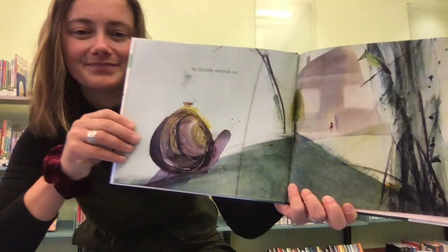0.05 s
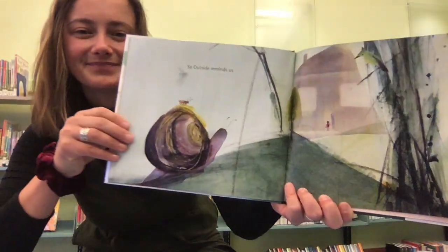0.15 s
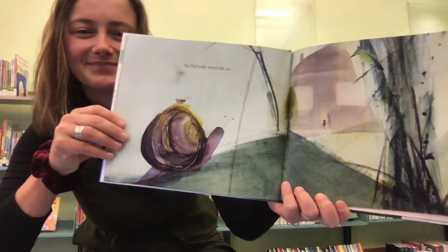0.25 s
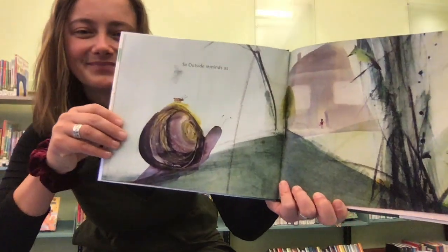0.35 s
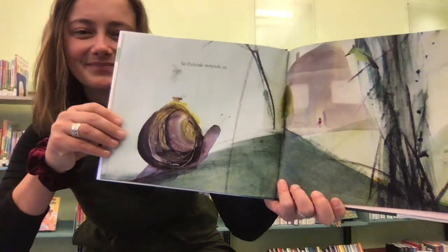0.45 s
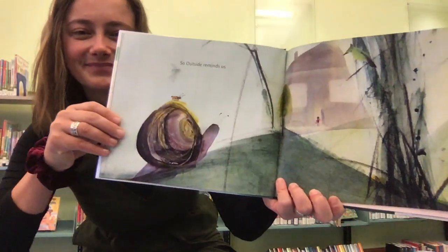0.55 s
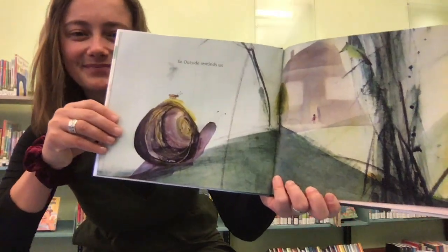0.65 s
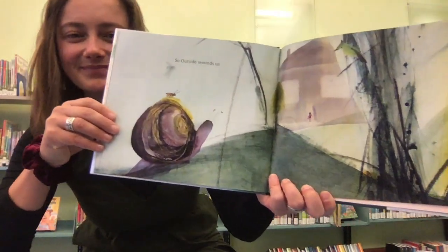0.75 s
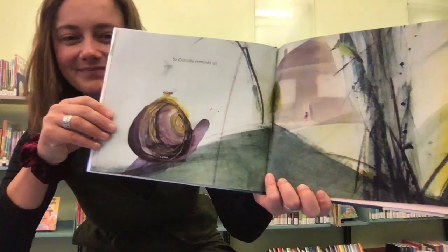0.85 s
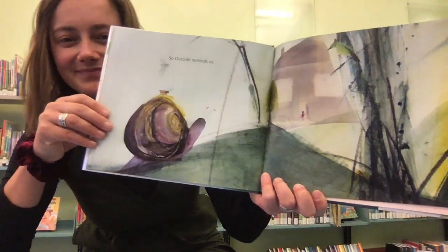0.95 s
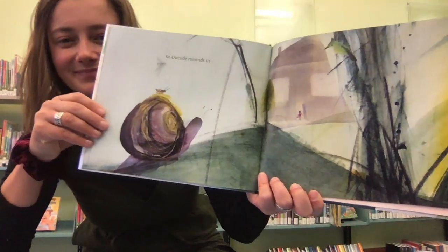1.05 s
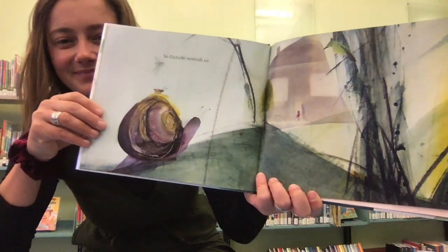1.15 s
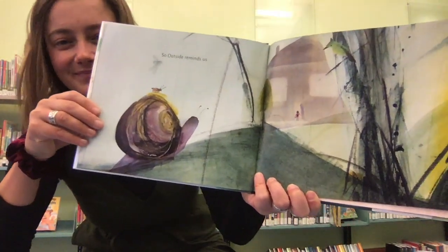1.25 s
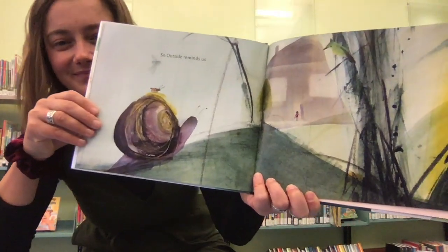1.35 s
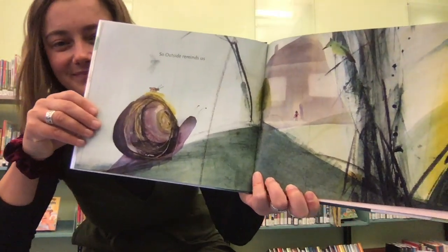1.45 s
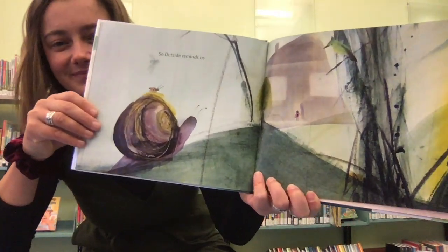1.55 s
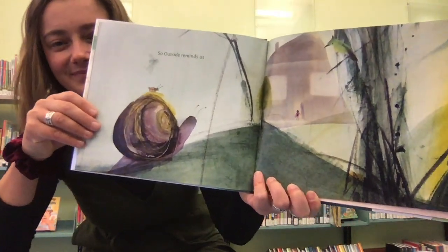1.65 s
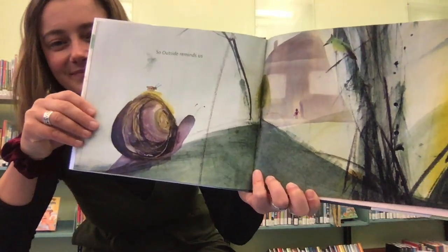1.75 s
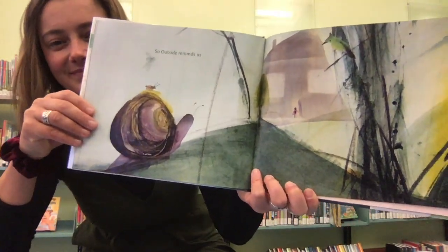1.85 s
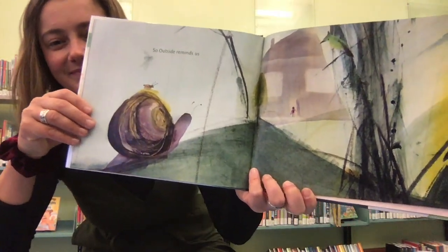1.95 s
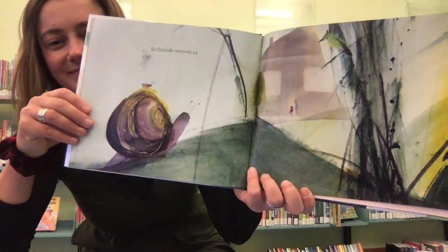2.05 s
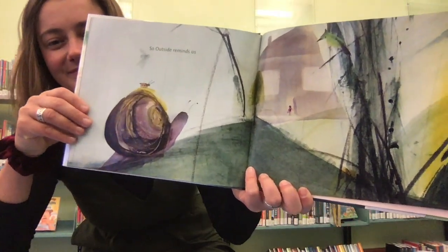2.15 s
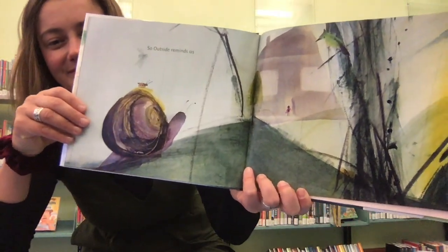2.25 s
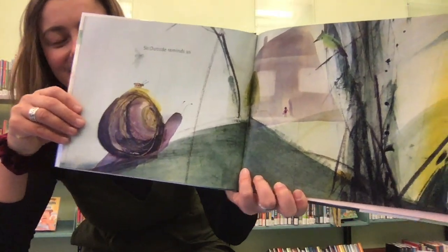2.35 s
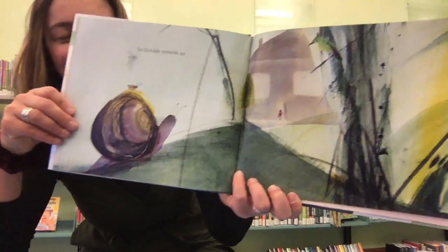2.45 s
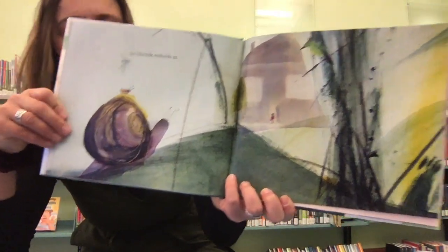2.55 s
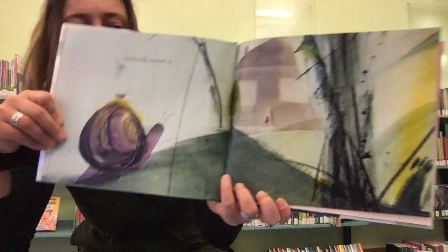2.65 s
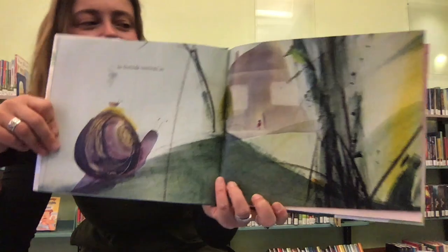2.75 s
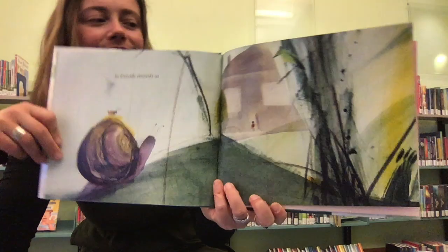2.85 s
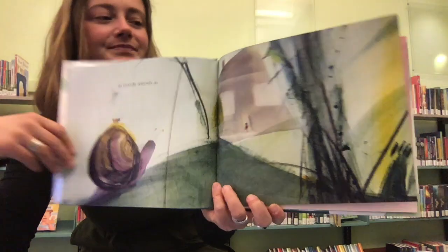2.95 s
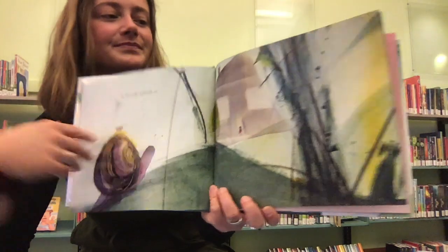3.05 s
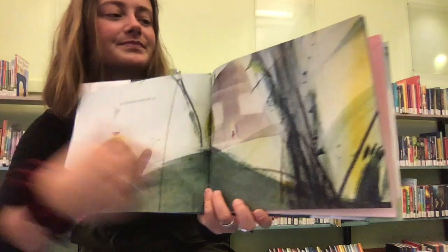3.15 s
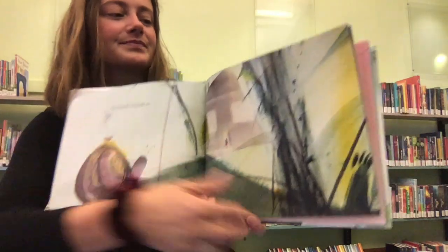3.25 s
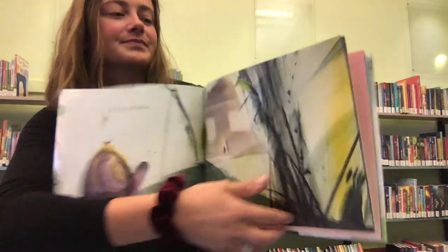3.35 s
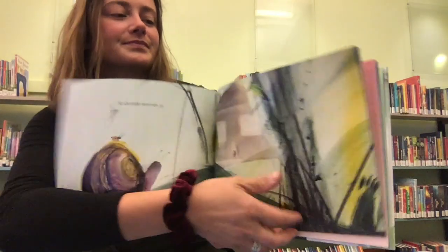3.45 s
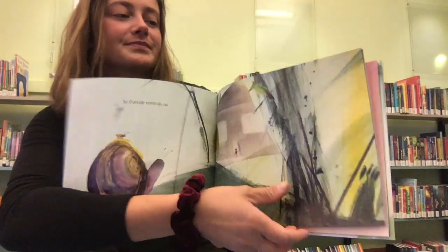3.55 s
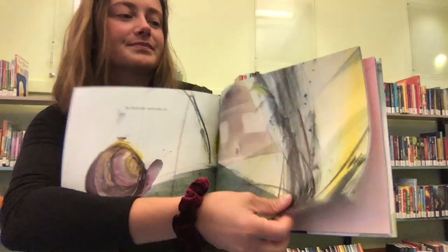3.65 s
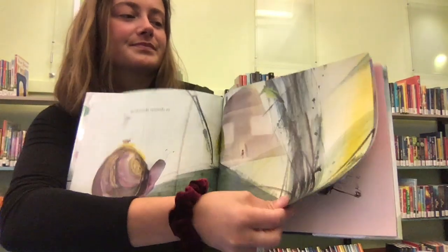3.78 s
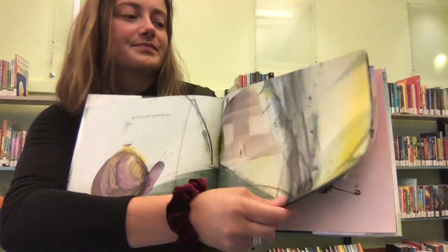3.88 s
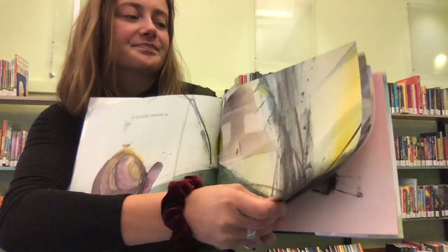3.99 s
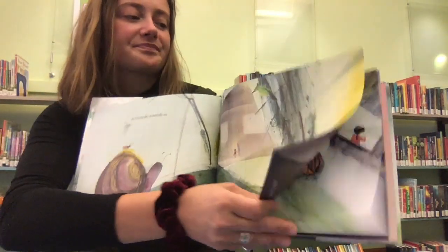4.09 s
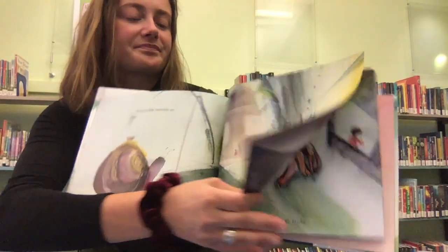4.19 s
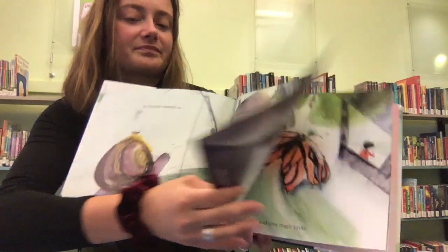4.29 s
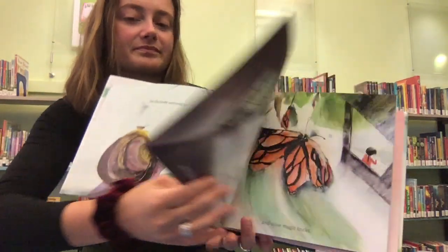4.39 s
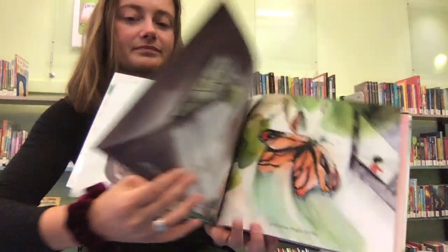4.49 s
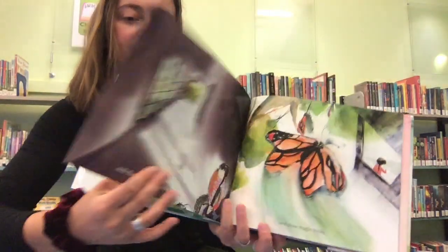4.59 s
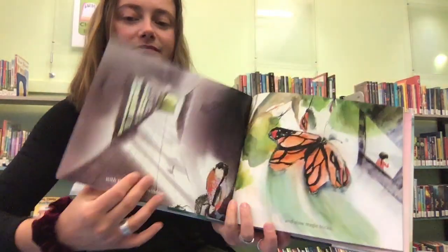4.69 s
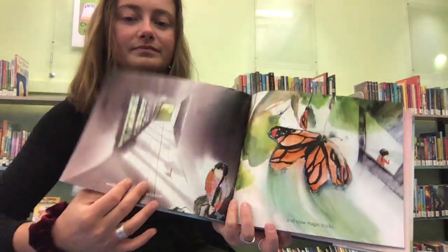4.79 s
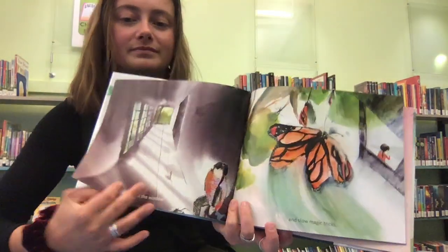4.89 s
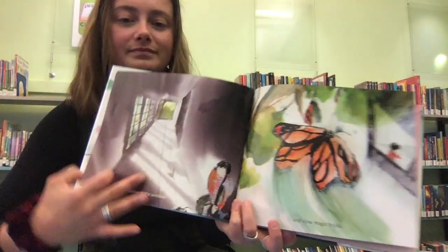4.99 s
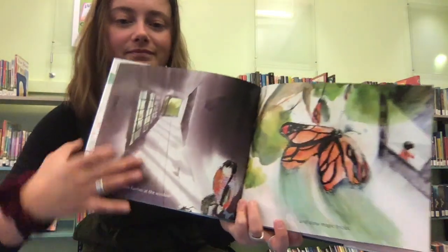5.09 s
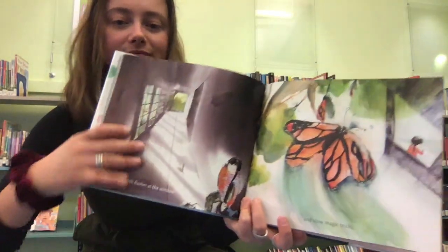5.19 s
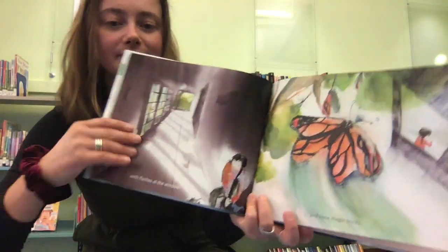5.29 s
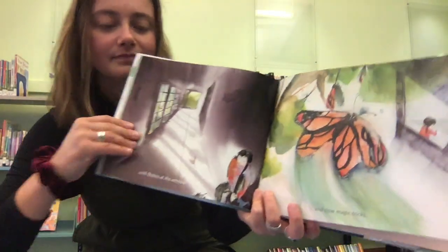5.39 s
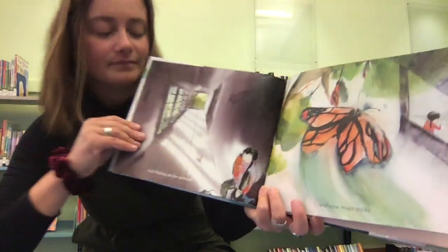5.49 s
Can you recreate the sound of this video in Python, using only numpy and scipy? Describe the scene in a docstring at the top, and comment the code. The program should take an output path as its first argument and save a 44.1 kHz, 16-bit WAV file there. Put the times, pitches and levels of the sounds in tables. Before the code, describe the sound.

A quiet library with low, slightly restless ventilation noise and a faint steady hum throughout, heard close with a short dull echo. Near 0.1 s the book's binding creaks weakly, with tiny paper ticks around 0.2 s. Sparse ticks follow, a clearer one at 1.5 s. From 2.35 to 3.1 s the grip shifts with faint rubbing, stick-slip creaking and small taps. At about 3.4 s fingers knock on the cover board in a tight, hollow cluster, the strongest knock so far, with dull low bumps. From 3.75 to 4.5 s a stiff page is drawn away in short, bright, uneven rasps; sharp snaps and crinkles crowd together between 4.1 and 4.36 s, the loudest moment. At 4.56 s the page lands with a light double knock. Softer palm strokes smooth it until 5.5 s, with small taps near 4.95 s, very faint gliding papery hisses and a low closing bump.

```python
"""The binding of a large picture book creaks and its paper ticks in the grip, in a quiet library.
Fingers shift their hold and knock on the cover board; then one stiff page is drawn off the next sheet.
It slides in short pulls of filtered friction grains and buckles in sharp snaps: air pulse, crack and ring.
It falls over and a palm smooths it flat in softer strokes, some edges singing in gliding narrow bands.
Low ventilation noise and a steady mains hum lie underneath throughout."""
import sys
import numpy as np
from scipy import signal
from scipy.fft import rfft, irfft, next_fast_len
from scipy.io import wavfile

SR = 44100
rng = np.random.default_rng(int(sys.argv[2]) if len(sys.argv) > 2 else 0)


def pcm_store(signal):
    """Save signal as 16-bit PCM."""
    levels = np.round(np.clip(np.atleast_2d(signal), -1, 1) * 32767)
    wavfile.write(sys.argv[1], SR, levels.astype(np.int16).T)


N = 243740
T = np.arange(N) / SR  # time in seconds
HIT_T = T[:8192]  # time within one short hit, in seconds

# Hiss of skin on paper, for grip and palm. Each row: frequency in Hz, relative level in dB.
SKIN_HISS = [(2200, -1.5), (3200, -4.5), (4600, -5), (7200, -6), (8800, -14), (10200, -10), (11400, -27),
             (15500, -23)]


def undb(db):
    """Decibels to gain."""
    return 10 ** (np.asarray(db) / 20)


def unit(x):
    """Scale to rms 1."""
    return x / np.sqrt(np.mean(x ** 2))


def peak(x):
    """Scale to peak 1."""
    return x / np.abs(x).max()


def add(out, start, x):
    """Mix x into out from a start in seconds."""
    i = max(int(start * SR), 0)
    out[i:i + len(x)] += x[:N - i]


def colour(x, points):
    """Minimum-phase filter through (Hz, relative dB) points, with mean power gain 1."""
    size = next_fast_len(len(x) // 2 + 2048) * 2
    hz, db = np.transpose(points)
    f = np.maximum(np.arange(size // 2 + 1) * SR / size, 1)
    gain = unit(undb(np.interp(np.log(f), np.log(hz), db)))
    # folding the cepstrum forward in time makes the filter causal
    cepstrum = irfft(np.log(gain))
    cepstrum[1:size // 2] *= 2
    cepstrum[size // 2 + 1:] = 0
    response = np.exp(rfft(cepstrum))
    return irfft(rfft(x, size) * response)[:len(x)]


def walk(rate):
    """Random curve of rms 1, straight between knots that come rate times a second."""
    knots = rng.standard_normal(int(N / SR * rate) + 2)
    return unit(np.interp(T * rate, np.arange(len(knots)), knots))


def grains(size, rate, spread_db):
    """Fibres catching and letting go: random clicks per second, a few much larger than the rest."""
    catches = rng.random(size) < rate / SR
    strength = rng.standard_normal(size)
    boost = undb(spread_db * np.minimum(rng.exponential(size=size), 4))
    return unit(catches * strength * boost)


def ring(modes, contact_ms, detune):
    """Damped modes, each pitch drawn a little at random; a longer push leaves out the high ones."""
    hz, t60, db = np.transpose(modes)[:, :, None]
    hz = hz * (1 + detune * rng.standard_normal(hz.shape))
    decay = np.exp(-np.log(1000) * HIT_T / t60)
    free = np.sum(undb(db) * np.cos(2 * np.pi * hz * HIT_T) * decay, axis=0)
    push = np.sin(np.pi * np.minimum(1000 * HIT_T / contact_ms, 1)) ** 2
    return peak(signal.fftconvolve(free, push)[:len(HIT_T)])


def burst(decay_s, tail_db, tail_s):
    """A sharp crack of noise with a weaker, slower-fading noise tail."""
    crack = np.exp(-HIT_T / decay_s)
    tail = undb(tail_db) * np.exp(-HIT_T / tail_s)
    return rng.standard_normal(len(HIT_T)) * (crack + tail)


def wander(x, depth_db, rate=18):
    """As the sheet bends, different parts of its hiss come through: each band swells and fades alone."""
    centres = np.geomspace(2500, 12000, 7)  # Hz
    spectrum = rfft(x)
    f = np.arange(N // 2 + 1) * SR / N
    out = np.zeros(N)
    for band in np.eye(len(centres)):
        part = irfft(spectrum * np.interp(f, centres, band), N)
        out += part * undb(depth_db * walk(rate))
    return unit(out)


def strokes(rows, attack_s, sag_db_per_s, release_s):
    """Gains of rub and hiss: each stroke takes hold, eases while it slides, then dies away."""
    rub, hiss = np.zeros(N), np.zeros(N)
    for start, end, rub_db, hiss_db in rows:
        age = np.maximum(T - start, 0)
        hold = np.minimum(age / attack_s, 1) * undb(-sag_db_per_s * age)
        effort = hold * np.exp(-np.maximum(T - end, 0) / release_s)
        rub = np.maximum(rub, undb(rub_db) * effort)
        hiss = np.maximum(hiss, undb(hiss_db) * effort)
    return rub, hiss


def slide(gains, rub_colour, hiss_colour, rub_db, hiss_db, grain_rate, spread_db, judder_db, wander_db):
    """Paper friction: dense catches drive the sheet and hiss at the contact; the hand judders both."""
    rub, hiss = gains
    body = colour(grains(N, grain_rate, spread_db), rub_colour)
    top = wander(colour(grains(N, 2 * grain_rate, spread_db), hiss_colour), wander_db)
    judder = unit(undb(judder_db * walk(130)))
    return (body * undb(rub_db) * rub + top * undb(hiss_db) * hiss) * judder


def page_pulls():
    """The page is drawn off the next sheet in short pulls of bright paper friction."""
    # Each row: start in seconds, end in seconds, rub and hiss levels in dB before trim, judder and sag.
    pulls = [(3.745, 3.792, -43.5, -44.5), (3.8, 3.87, -52.5, -52.5), (3.874, 3.93, -37, -39),
             (3.935, 4.01, -46, -44), (4.02, 4.085, -42, -48), (4.13, 4.28, -52.5, -64),
             (4.295, 4.362, -46.5, -50), (4.432, 4.488, -55, -64)]
    # Colours of rub and hiss. Each row: frequency in Hz, relative level in dB.
    rub_colour = [(150, -13.5), (450, -7), (950, 1), (1600, -2), (2200, -6.5), (2650, -6.5), (3300, -38)]
    hiss_colour = [(2000, -15), (3000, -1), (4200, 0.5), (7000, -3), (9000, -12.5), (10300, -11),
                   (11500, -24), (15500, -20.5)]
    gains = strokes(pulls, attack_s=0.022, sag_db_per_s=23, release_s=0.025)
    return slide(gains, rub_colour, hiss_colour, rub_db=2.0, hiss_db=-3.5,
                 grain_rate=4000, spread_db=2, judder_db=0.95, wander_db=2.5)


def snaps(flip_s=0.0002, crack_s=0.0011, tail_db=-10, tail_s=0.004, ring_db=-16):
    """The bowed sheet flips through: one suck-and-push of air, a crack, and a short ring."""
    # Buckles of the sheet. Each row: time in seconds, peak of the air pulse in dB, peak of the crack in dB.
    buckles = [(3.8624, -37, -31.5), (4.0316, -34.5, -27), (4.1134, -20.5, -27.5), (4.1377, -17.5, -28.5),
               (4.1857, -16, -22.5), (4.2267, -16, -23.5), (4.2626, -15.5, -28), (4.3008, -21, -33.5),
               (4.3204, -22, -49), (4.3572, -20.5, -35), (4.5537, -28, -58)]
    # Colour of the crack. Each row: frequency in Hz, relative level in dB.
    crack_colour = [(900, 2), (2000, 13.5), (3300, -6.5), (4700, 3), (7000, 0.5), (9800, -2), (10700, -6),
                    (11800, -21), (15500, -28)]
    # Modes of the sheet. Each row: frequency in Hz before detuning, t60 in seconds, relative level in dB.
    sheet_modes = [(556, 0.028, -19), (695, .03, -18), (912, 0.043, 20), (1270, 0.038, -15),
                   (1520, .02, -12), (2400, .015, -21)]
    out = np.zeros(N)
    lead = .001  # seconds from the start of the pulse to its middle
    u = (HIT_T - lead) / flip_s
    pulse = peak(u * np.exp(-np.hypot(u, .8) ** 1.965 / 2))
    for time, pulse_db, crack_db in buckles:
        crack = peak(colour(burst(crack_s, tail_db, tail_s), crack_colour))
        add(out, time - lead, undb(pulse_db) * pulse)
        add(out, time - flip_s, undb(crack_db) * crack)
        # the ring level is relative to the pulse
        add(out, time + lead, undb(pulse_db + ring_db) * ring(sheet_modes, contact_ms=0.32, detune=0.14))
    return out


def creases(rate=9000, treble_db=-15):
    """A kink runs through the paper as a quick swell of tiny snaps."""
    # Each row: start in seconds, rms level in dB, length in seconds, centre frequency in Hz.
    kinks = [(.446, -62.5, 0.0045, 2250), (3.371, -42, 0.0018, 1280), (3.424, -37.5, 0.0086, 1530),
             (3.638, -50.5, 0.021, 1420), (3.863, -32.5, 0.0047, 1300), (4.096, -36.5, 0.0084, 1930),
             (4.136, -32, 0.02, 1620), (4.155, -35, 0.02, 1100), (4.187, -28.5, 0.00535, 920),
             (4.303, -32, 0.012, 1000), (4.352, -34.5, 0.014, 2050), (5.032, -49, 0.013, 3200)]
    out = np.zeros(N)
    for start, db, length, hz in kinks:
        swell = np.sqrt(np.sin(np.pi * np.minimum(HIT_T / length, 1)))
        tone = [(hz / 6, -20), (hz / 2, -3), (hz, 0), (hz * 1.22, -6), (hz * 1.87, treble_db),
                (10500, -36), (12500, -48)]
        x = colour(grains(len(HIT_T), rate, spread_db=0.5) * swell, tone)
        rms = np.sqrt(np.sum(x ** 2) / (length * SR))
        add(out, start, undb(db) * x / rms)
    return out


def sing(start, end, from_hz, to_hz, width_hz, db):
    """One narrow band of noise around a gliding pitch; faster walks make it wider."""
    progress = np.clip((T - start) / (end - start), 0, 1)
    phase = 2 * np.pi * np.cumsum(from_hz + (to_hz - from_hz) * progress) / SR
    band = walk(width_hz) * np.cos(phase) + walk(width_hz) * np.sin(phase)
    return undb(db) * np.sin(np.pi * progress) * band


def singing_edges():
    """Sliding edges ring in narrow bands that glide as the free length of paper changes."""
    # Each row: start in seconds, end in seconds, first pitch in Hz, last pitch in Hz,
    # rough bandwidth in Hz, level in dB at mid-swell.
    glides = [(3.761, 3.828, 1190, 1452, 300, -39.5), (3.928, 3.998, 1755, 1565, 300, -40),
              (4.849, 4.97, 777, 754, 140.9, -55.5), (5.134, 5.337, 5000, 4610, 1300, -71.5),
              (5.291, 5.439, 3900, 4314, 1100, -64.5), (5.418, 5.526, 4410, 4840, 1483, -63.5)]
    return sum(sing(*row) for row in glides)


def palm_strokes():
    """The palm smooths the page flat: dense, fine friction with a low rub."""
    # Each row: start in seconds, end in seconds, rub and hiss levels in dB before trim, judder and sag.
    wipes = [(4.545, 4.68, -52, -61.5), (4.72, 4.84, -55.5, -64), (4.845, 5.035, -56.5, -56),
             (5.1, 5.25, -64, -68.5), (5.275, 5.385, -56.5, -65), (5.435, 5.485, -56, -62.5)]
    # Colour of the rub. Each row: frequency in Hz, relative level in dB.
    rub_colour = [(130, -7), (200, -2.5), (330, -7.5), (500, -4.5), (760, -1), (1050, -5), (2200, -10.5),
                  (3200, -37.5)]
    gains = strokes(wipes, attack_s=0.009, sag_db_per_s=10.5, release_s=0.044)
    return slide(gains, rub_colour, SKIN_HISS, rub_db=-0.5, hiss_db=-1.5,
                 grain_rate=9000, spread_db=2.2, judder_db=0.64, wander_db=2.0)


def knocks(contact_ms=0.92, detune=.055):
    """Fingers and the falling page strike the cover board and set its damped modes ringing."""
    # Soft blows on the board. Each row: time in seconds, peak level in dB.
    blows = [(2.644, -39), (2.74, -41), (2.763, -41), (2.918, -39), (3.37, -33.5), (3.4145, -28.5),
             (3.4243, -14.5), (3.4286, -18), (3.4333, -13), (3.4535, -26.5), (4.5603, -26), (4.5645, -26.5),
             (4.678, -32.5), (4.9437, -26), (4.9882, -34)]
    # Modes of the board. Each row: frequency in Hz before detuning, t60 in seconds, relative level in dB.
    board_modes = [(372, 0.053, -9.5), (705, 0.053, 0.5), (806, 0.028, 10), (950, 0.027, -8),
                   (1200, 0.036, 1.5), (1400, 0.028, -2), (1880, .02, -10)]
    # a small board radiates its lowest motion poorly
    radiation = [(200, -7.5), (480, -4), (700, -4), (3000, 1.5)]
    out = np.zeros(N)
    for time, db in blows:
        blow = colour(ring(board_modes, contact_ms, detune), radiation)
        add(out, time, undb(db) * peak(blow))
    return out


def bumps(cycles=4.1):
    """The whole book sways and pushes air: a few low swings that swell quickly and die out."""
    # Dull bumps. Each row: start in seconds, approximate peak level in dB, swing frequency in Hz.
    sways = [(3.352, -35, 38.7), (3.446, -35, 42), (3.602, -38, 36.2), (4.172, -41, 68.5), (4.559, -42, 51),
             (5.313, -41.5, 202), (5.42, -33.5, 31.8)]
    out = np.zeros(N)
    for start, db, hz in sways:
        length = cycles / hz
        t = T[:int(length * SR)]
        swell = np.sin(np.pi * np.sqrt(t / length)) ** 2
        add(out, start, undb(db) * swell * np.sin(2 * np.pi * hz * t))
    return out


def grip_shifts():
    """The fingers shift their hold on the book: sparser friction with a strong judder."""
    # Each row: start in seconds, end in seconds, rub and hiss levels in dB before trim, judder and sag.
    holds = [(.16, .27, -64, -87), (2.35, 2.6, -60, -86), (2.61, 2.76, -59.5, -72),
             (2.87, 3.07, -57.5, -69.5), (3.302, 3.46, -49.5, -59), (3.49, 3.62, -61.5, -79.5),
             (3.637, 3.68, -51.5, -60), (3.7, 3.75, -60, -61.5)]
    # Colour of the rub. Each row: frequency in Hz, relative level in dB.
    rub_colour = [(150, -27), (400, 0.5), (800, 4.5), (1300, 0), (2400, -7.5), (3300, -39)]
    gains = strokes(holds, attack_s=0.004, sag_db_per_s=7, release_s=0.042)
    return slide(gains, rub_colour, SKIN_HISS, rub_db=-3.0, hiss_db=-2.5,
                 grain_rate=3200, spread_db=1.0, judder_db=3.0, wander_db=3.5)


def ticks(body_db=-3, top_db=6, ping_db=5):
    """Paper and binding tick in the grip: a papery body and a bright snick that favours one pitch."""
    # Each row: time in seconds, level in dB and treble in dB (both before the trims), favoured pitch in Hz.
    lone_ticks = [(0.1672, -52.5, -13, 5600), (.203, -54, -22, 4700), (0.2448, -43.5, -18, 5500),
                  (0.2519, -40.5, -12, 5060), (.6464, -54, -7, 10100), (.796, -53.5, -5.5, 9900),
                  (1.1333, -51.5, -37, 4730), (1.5287, -35, -12.5, 3400), (1.2123, -57, -25, 3500),
                  (1.697, -45.5, -19, 5110), (2.737, -49, -10, 4240), (2.7628, -37.5, -38, 4030),
                  (2.8791, -46, -16, 3750), (2.993, -47, -9.5, 4700), (3.1075, -37, -19.5, 6800),
                  (3.3148, -37, -15, 3940), (3.4427, -36.5, -12.5, 3660), (3.6625, -37.5, -10, 6100),
                  (4.4462, -37, -17, 5100)]
    # Colours of body and snick. Each row: frequency in Hz, relative level in dB.
    body_colour = [(400, -25), (1000, 11), (1700, 6), (2400, 2), (3000, -4.5), (4200, -3), (6000, -29)]
    top_colour = [(1800, -24), (3500, 8), (7000, 4), (10400, -3.5), (11700, -12), (15500, -45)]
    out = np.zeros(N)
    for time, db, treble_db, hz in lone_ticks:
        x = burst(0.0011, -14, 0.016)
        ping = [(hz * .8, 0), (hz, ping_db), (hz * 1.2, 0)]
        body = undb(body_db) * peak(colour(x, body_colour))
        snick = undb(top_db + treble_db) * peak(colour(colour(x, top_colour), ping))
        add(out, time, undb(db) * (body + snick))
    return out


def creaks():
    """The binding sticks and slips at an uneven rate as the book is moved."""
    # Runs of slips. Each row: start in seconds, end in seconds, mean slips per second,
    # typical slip level in dB, treble in dB relative to the body.
    runs = [(0.029, .14, 75, -49.5, -14.5), (2.353, 2.6, 130, -55.5, -32), (2.614, 2.73, 63, -52, -20)]
    # Colours of body and treble. Each row: frequency in Hz, relative level in dB.
    body_colour = [(500, -0.5), (750, 4.5), (1000, 14), (1250, 2), (1550, -1.5), (2100, -20.5), (2850, -4),
                   (3300, -42)]
    top_colour = [(3800, 4), (5000, 16), (7000, 14), (8200, -6), (12000, -61)]
    out = np.zeros(N)
    for start, end, rate, db, treble_db in runs:
        for time in np.arange(start, end, 1 / rate):
            x = burst(0.00019, -9.5, 0.007)
            slip = peak(colour(x, body_colour)) + undb(treble_db) * peak(colour(x, top_colour))
            uneven = rng.uniform(-.3, .3) / rate
            add(out, time + uneven, undb(db + 1.3 * rng.standard_normal()) * slip)
    return out


def room(x, wet_db=-20, t60_s=0.2):
    """Shelves of books give a short, dull echo: decaying noise after a 4 ms gap."""
    t = T[:SR // 2]
    tail = rng.standard_normal(len(t)) * np.exp(-np.log(1000) * t / t60_s) * (t > .004)
    tail = colour(tail, [(100, 6), (800, -0.5), (2000, -16.5), (4000, -16), (12000, -11.5)])
    tail = tail / np.sqrt(np.sum(tail ** 2))
    return x + undb(wet_db) * signal.fftconvolve(x, tail)[:N]


def ventilation(air_db=-52.0, hum_db=-65, hum_hz=120):
    """Low, slightly restless air noise and a mains hum."""
    # Colour of the air noise. Each row: frequency in Hz, relative level in dB.
    air_colour = [(15, -20.5), (24, -2), (35, 1), (48, -5.5), (72, -4.5), (95, -13.5), (150, -19.5),
                  (250, -24.5), (500, -25), (1000, -31), (1500, -42.5), (2400, -49), (3300, -57.5),
                  (10000, -64), (12000, -80)]
    air = unit(colour(rng.standard_normal(N), air_colour)) * undb(0.84 * walk(6))
    hum = unit(np.sin(2 * np.pi * hum_hz * T))
    return undb(air_db) * air + undb(hum_db) * hum


def scene():
    """One page turn: every sound of the book passes through the room, over the ventilation."""
    page = page_pulls() + snaps() + creases() + singing_edges() + palm_strokes()
    cover = knocks() + bumps()
    hold = grip_shifts() + ticks() + creaks()
    return (room(page + cover + hold) + ventilation())[None]


def record(dry):
    """A steep low-pass cuts the top above 15.6 kHz."""
    low_pass = signal.ellip(8, .2, 70, 15600, fs=SR, output="sos")
    return signal.sosfilt(low_pass, dry)


dry = scene()
out = record(dry)
pcm_store(out)
```